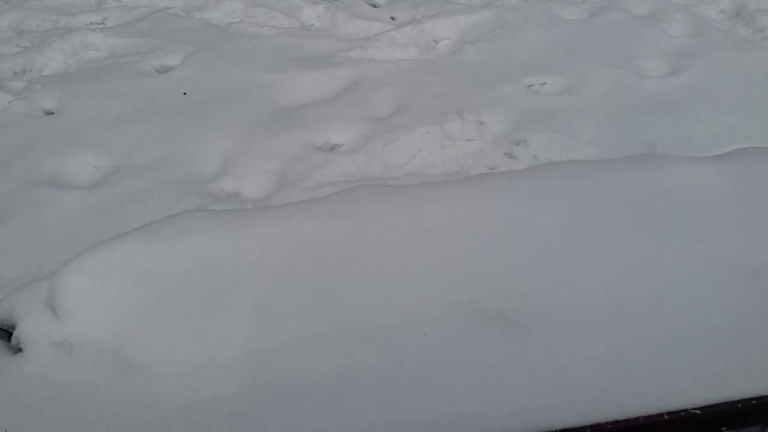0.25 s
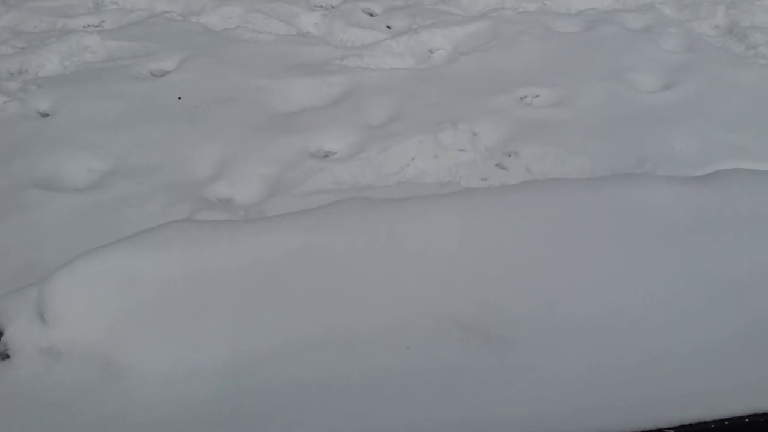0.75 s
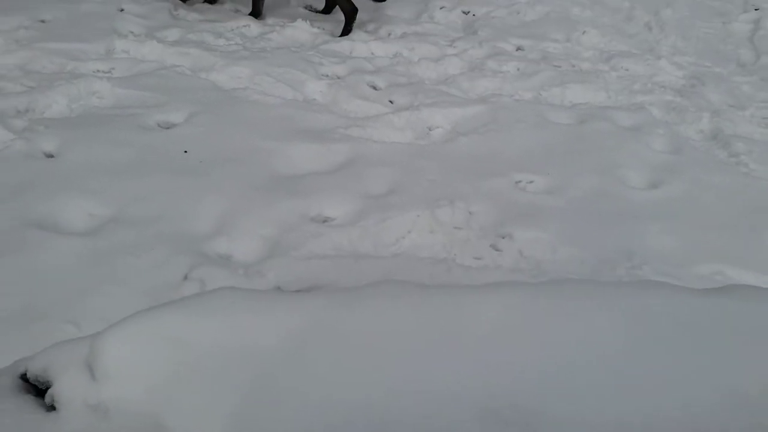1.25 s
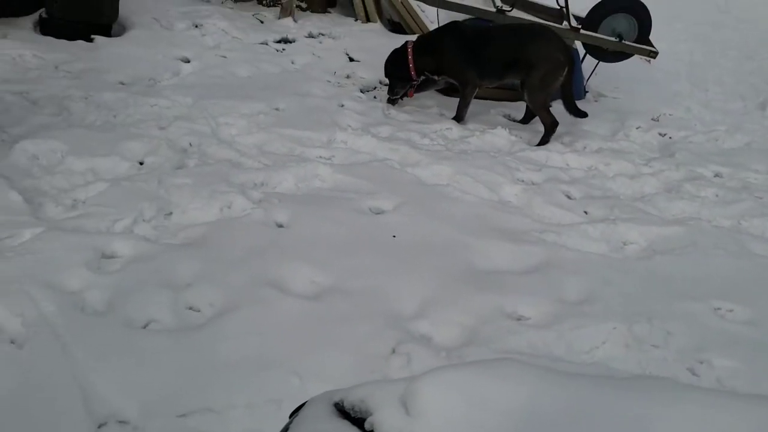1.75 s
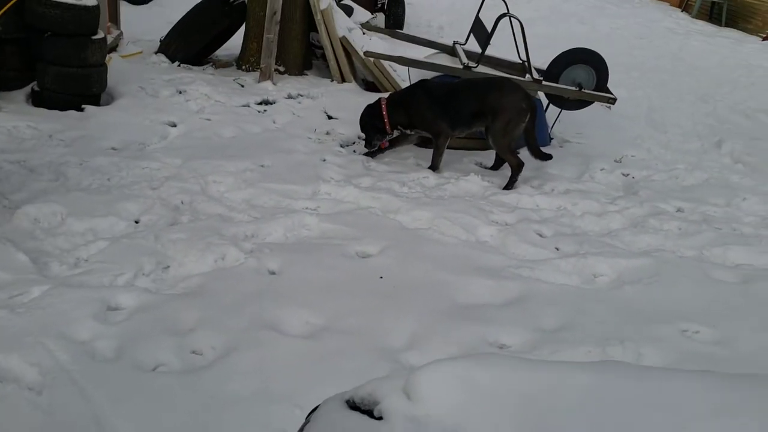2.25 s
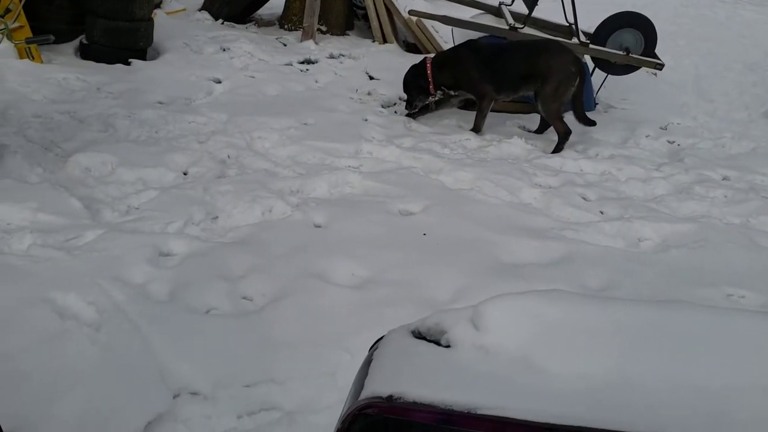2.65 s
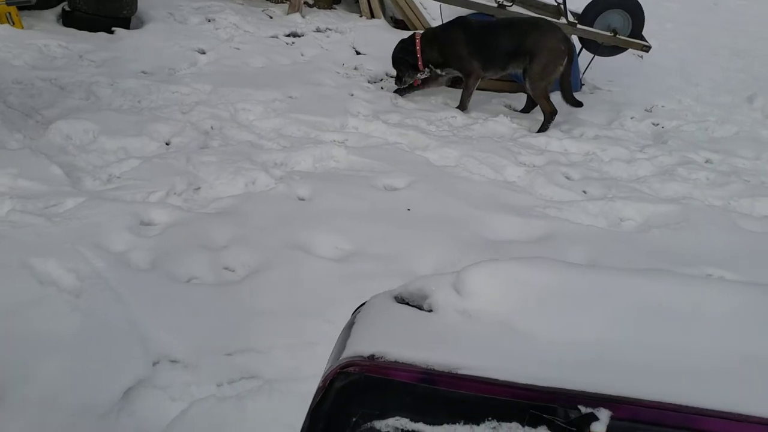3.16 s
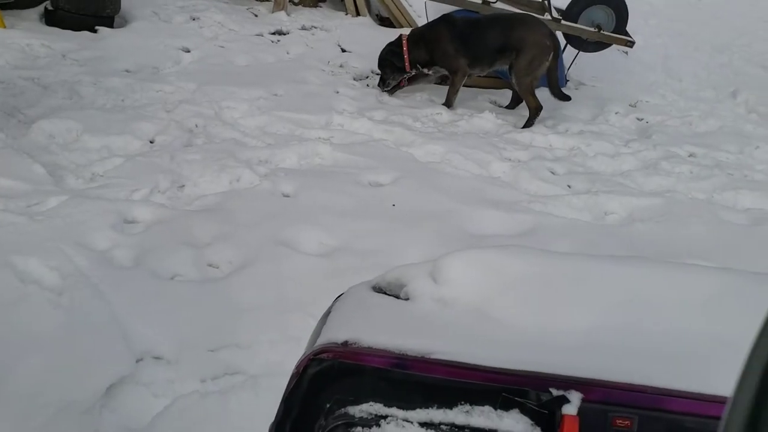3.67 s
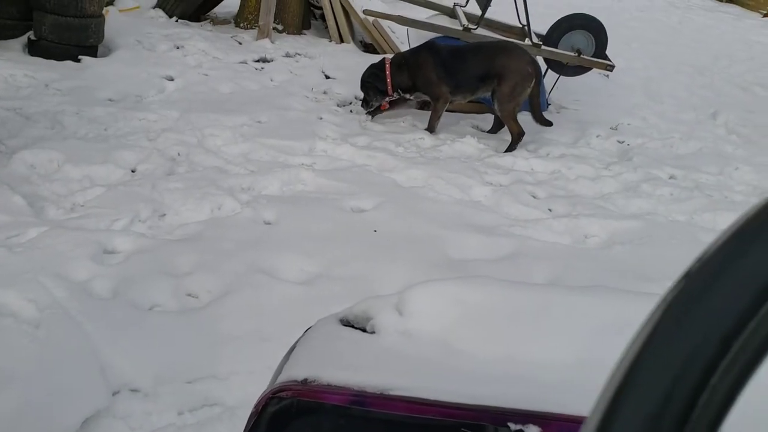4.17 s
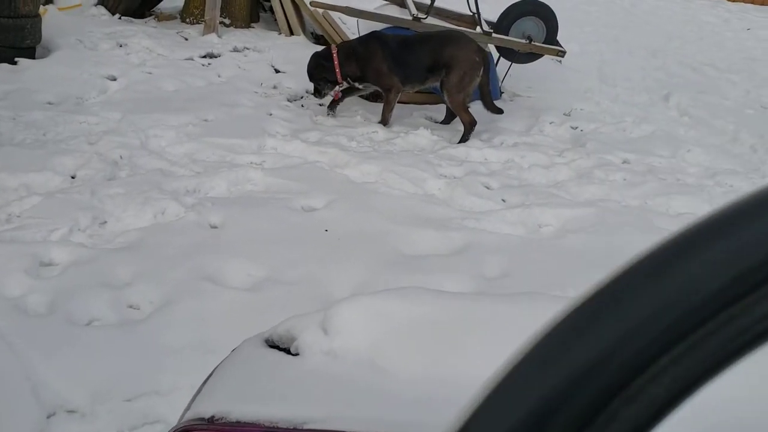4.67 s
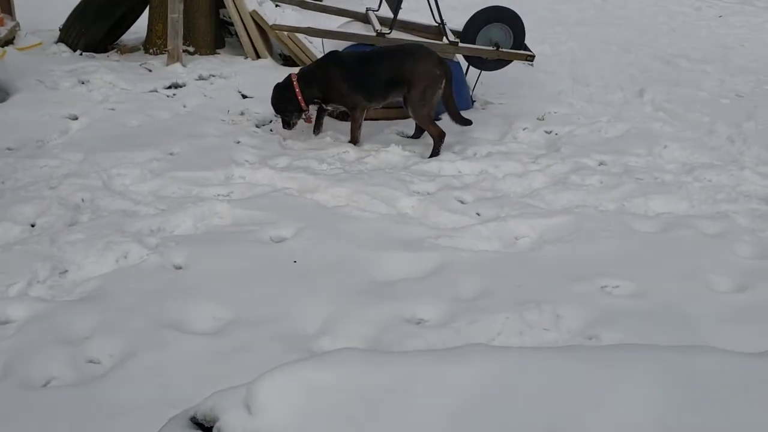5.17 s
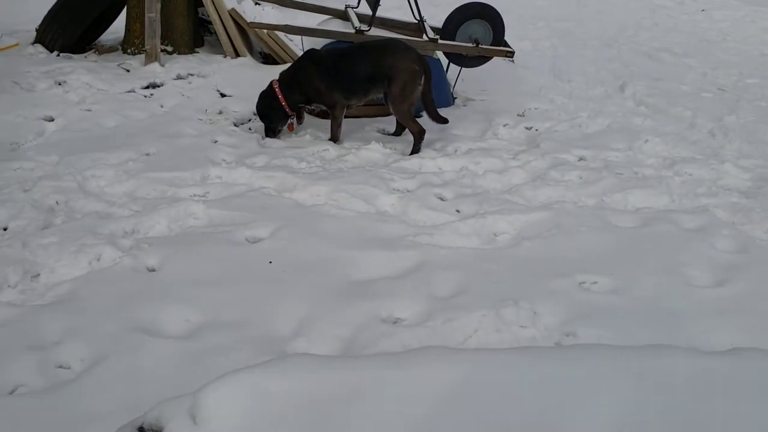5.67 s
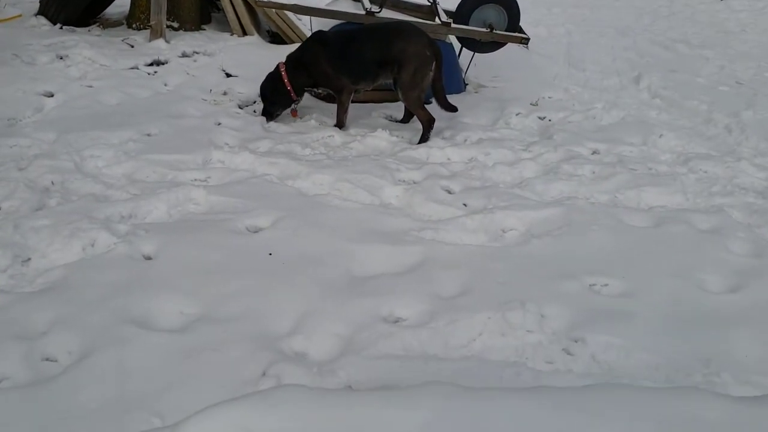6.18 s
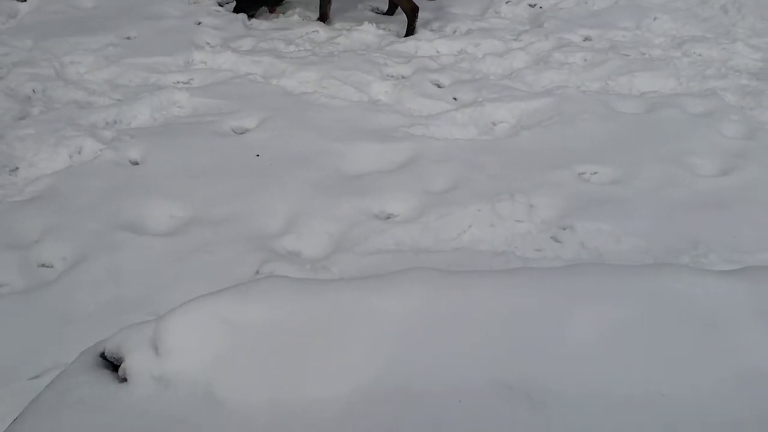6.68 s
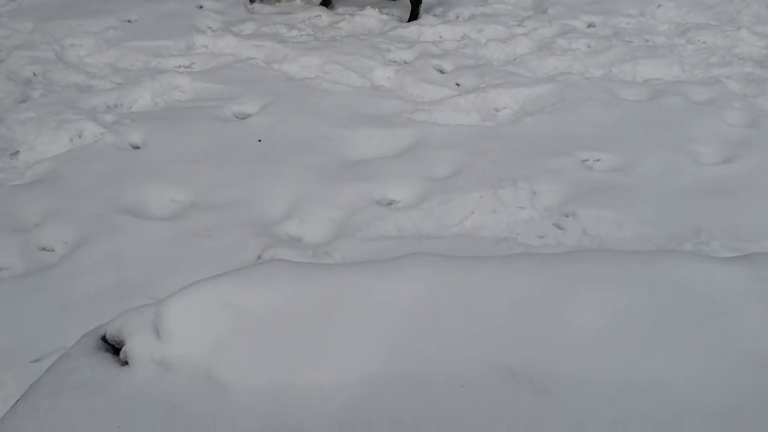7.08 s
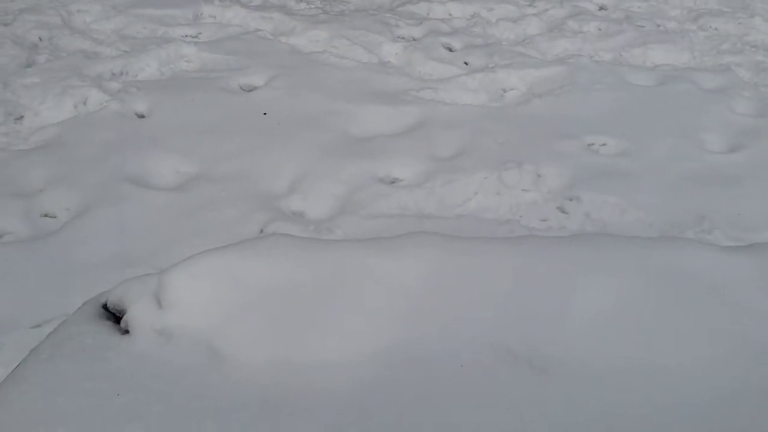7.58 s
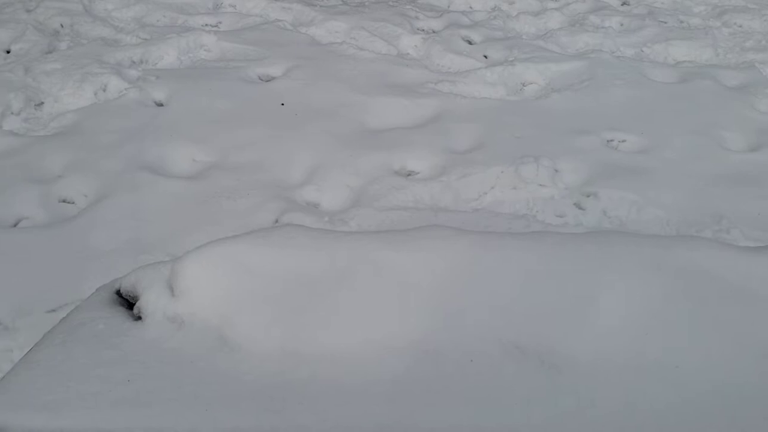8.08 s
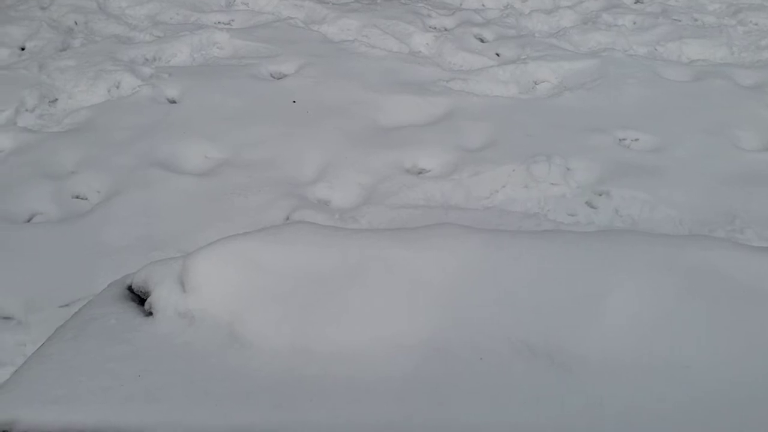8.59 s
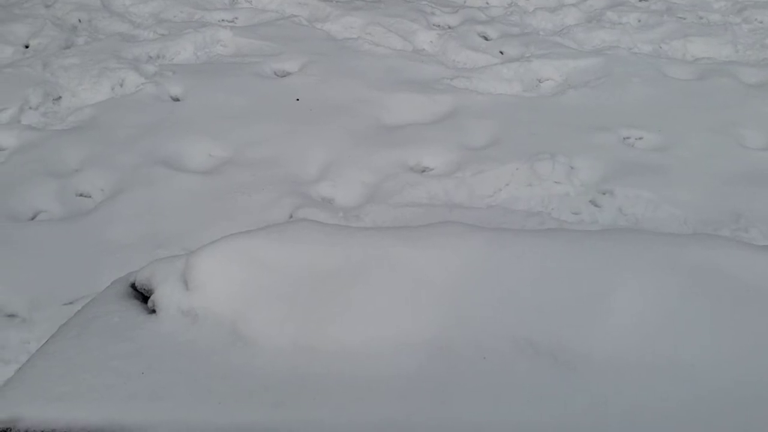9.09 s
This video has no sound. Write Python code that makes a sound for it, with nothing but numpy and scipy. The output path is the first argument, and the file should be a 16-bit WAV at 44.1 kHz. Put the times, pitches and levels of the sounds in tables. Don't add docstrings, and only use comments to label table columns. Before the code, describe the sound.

A small single-cylinder engine idles under a cart seat in a snowy yard, recorded close in stereo. From 0 to 1.7 s it putters unevenly, about seven deep pulses a second, with body panels droning low. A seat creak opens, followed by ticks, sharp clicks, dull knocks and crackling stiff jacket cloth; a firm thump lands at 1.7. From 2 s the firing grows fuller, faster and steady, with faint belt whine and soft rustles. It sags at 3.6-4 s with a knock near 3.85, then climbs to about eleven pulses a second by 6, a nylon zip at 5.3. Cloth swells from 6.3, and a sleeve rubs the microphone heavily around 7. The strongest thump hits at 7.2 as the engine drops away; smaller knocks and ticks follow. At 8.2 it is weakest and slowest, then lumpily gathers again until 9.3, cloth nearly still.

```python
import sys
import numpy as np
from scipy import signal
from scipy.fft import rfft, irfft, next_fast_len
from scipy.io import wavfile
from scipy.ndimage import uniform_filter1d, map_coordinates

SR = 44100
rng = np.random.default_rng(int(sys.argv[2]) if len(sys.argv) > 2 else 0)


def put_to_file(sound):
    columns = np.atleast_2d(sound).T
    safe = np.clip(columns, -1, 1)
    whole_steps = np.round(safe * 32767)
    wavfile.write(sys.argv[1], SR, whole_steps.astype(np.int16))


def boost(x):
    u = np.asarray(x, float) / 20
    return 10 ** u


N = 411894

# [t/s, rate/Hz, unevenness/0-1]
SPEED = [(0.0, 7.0, 0.36), (1.4, 7.0, 0.36), (1.7, 7.9, 0.1), (2.0, 8.89, 0.04), (2.3, 9.24, 0.03),
         (2.8, 10.06, 0.03), (3.45, 10.07, 0.03), (3.65, 9.19, 0.2), (3.9, 7.31, 0.3), (4.3, 8.6, 0.06),
         (4.7, 9.68, 0.03), (5.2, 10.71, 0.03), (6.0, 10.94, 0.03), (6.9, 10.78, 0.03), (7.35, 7.55, 0.3),
         (8.2, 5.65, 0.2), (8.6, 6.76, 0.12), (9.34, 7.7, 0.12)]
# [t/s, level/dB]
LOAD = [(0.0, -50), (0.28, -51.5), (1.17, -48), (2.05, -41), (2.84, -42), (3.5, -43), (3.8, -47.5),
        (4.45, -42.5), (5.25, -41), (6.09, -40), (6.84, -41), (7.2, -51.5), (7.4, -50), (8.05, -54.5),
        (8.2, -58), (8.27, -50.5), (8.7, -49.5), (9.34, -47)]
FIRES_AT_S = 8.715
# [f/Hz, level/dB]
EXHAUST = [(22, -65), (33, -21.5), (42, -12), (55, 14.5), (110, -12), (210, -22.5), (350, -31.5),
           (2000, -64)]
# [f/Hz, density/dB per Hz]
CASING = [(82, 0.5), (140, 1), (275, -7.5), (406, -13), (470, -11.5), (592, -21), (948, -22), (1140, -29.5),
          (1560, -24.5), (1760, -32), (3500, -62), (4550, -64.5), (7700, -120)]
# [f/Hz, width/Hz, lift/dB]
BLOCK = [(204, 42, -9), (344.6, 15, -1), (920, 29, -1.5), (1020, 11, 3), (1189, 13, 16), (1380, 14, -0.5)]
CASING_DB, CASING_GROWS, FULL_LOAD_DB = -41, 0.7, -46.5
BOOM_HZ, BOOM_GROWS = 280, 0.9
# [order/multiple of firing rate, level/dB]
WHINE = [(44.4, -50), (48, -48.5), (51, -57)]
# [t/s, hold/s, level/dB]
BELT = [
    (2.1, 1.4, 0),
    (4.6, .9, -8),
    (5.6, 1.2, -1),
]
# [order/multiple of firing rate, level/dB]
FAN = [(89, -62), (96, -62)]
# [t/s, hold/s, level/dB]
FAN_SINGS = [
    (4.5, 1.25, 0),
]
# [f/Hz, level/dB]
SHROUD = [(400, -18), (445, -9), (478, 0), (520, -12), (560, -8), (870, -8), (940, -2), (1030, -4),
          (1070, -14)]
VALVE_HZ, VALVE_WIDE_HZ, VALVE_DB = 1035, 80, -21
# [t/s, hold/s, level/dB]
VALVE_RINGS = [
    (2.6, .72, 0),
]
CHUFF_HZ, CHUFF_WIDE_HZ, CHUFF_DB = 335, 90, -10
SLOW_RATE_HZ = 8
# [f/Hz, width/Hz, level over load/dB]
PANELS = [(84, 12, 1), (60.34, 7, 5.5)]
UPPER_DB, LOWER_DB = 5.5, 7.5
# [t/s, peak level/dB, length/s]
SURGES = [(0.01, -24, 0.097), (0.154, -24.5, 0.12), (.37, -28, 0.15), (0.495, -25, 0.052),
          (0.647, -26.5, 0.14), (0.76, -23.5, .1), (0.997, -27.5, 0.12), (1.34, -26.5, 0.14),
          (1.514, -27.5, 0.086), (1.657, -22.5, 0.039), (1.132, -27.5, 0.031), (1.861, -26.5, 0.07),
          (1.956, -22.5, 0.096), (2.13, -34, 0.067), (2.3, -28, 0.21), (2.489, -26.5, 0.25),
          (2.66, -27, 0.13), (2.868, -24, 0.049), (3.062, -25, 0.1), (3.265, -25, .08), (3.372, -24, 0.042),
          (3.516, -23.5, 0.25), (3.804, -25, 0.088), (4.011, -21, 0.15), (4.186, -23, 0.026),
          (4.287, -23.5, 0.14), (4.553, -26.5, 0.2), (4.702, -29, 0.22), (4.788, -30, 0.095),
          (5.05, -27, 0.086), (5.183, -25, 0.019), (5.27, -28, 0.069), (5.497, -26.5, 0.17),
          (5.666, -25, 0.06), (5.864, -24, 0.12), (6.048, -24.5, 0.045), (6.227, -23, 0.05),
          (6.326, -26, 0.025), (6.506, -26, 0.045), (6.698, -22, 0.053), (6.874, -23.5, 0.091),
          (7.208, -23.5, 0.17), (7.87, -35.5, 0.043), (7.96, -38, 0.033), (8.08, -33.5, 0.038),
          (8.29, -29, 0.035), (8.354, -25.5, 0.11), (8.512, -26, 0.089), (8.678, -21, 0.13),
          (8.844, -25.5, 0.058), (8.941, -25.5, .07), (9.024, -25, 0.055), (9.128, -24, 0.089),
          (9.278, -31.5, 0.083)]
# [t/s, peak level/dB, length/s]
HEAVES = [
    (.12, -36, 0.38),
    (1.99, -33, .06),
    (3.64, -32, 0.15),
    (4.35, -36, 0.1),
    (8.92, -31, .12),
    (9.12, -30.5, 0.18),
    (9.3, -32, .1),
]
# [t/s, peak level/dB]
CREAK = [
    (0.0014, -30),
    (0.0296, -39),
    (0.0507, -35.5),
    (0.082, -37),
    (0.1108, -40.5),
    (0.1272, -47),
    (0.1434, -36.5),
    (0.1595, -39.5),
    (0.1747, -42),
    (0.195, -37.5),
]
# [f/Hz, width/Hz, level/dB]
SEAT = [(1160, 83, -3), (1400, 68, -12.5), (1720, 58, -11.5), (2110, 85, -21), (2430, 37, -21.5),
        (4500, 51, -22.5), (5650, 55, -22.5)]
# [t/s, peak level/dB, ring f/Hz, brightness/dB]
TICKS = [(0.4133, -31.5, 1640, -30), (0.452, -34.5, 2310, -20), (0.5061, -18, 1400, -13),
         (0.539, -25.5, 1190, -32), (.552, -28, 1500, -25), (0.5594, -22, 1240, -30),
         (0.697, -16, 1820, -14.5), (0.865, -27, 2680, -30.5), (.78, -40, 900, -25),
         (0.901, -46, 1540, -24), (0.995, -33, 1670, -26), (1.025, -37, 1380, -25),
         (1.0508, -29, 1720, -16), (1.085, -27, 1880, -25), (1.098, -25.5, 955, -25),
         (1.16, -35.5, 2600, -18), (1.348, -37, 980, -11), (1.126, -23.5, 1500, -19.5),
         (1.223, -19.5, 1480, -30), (1.2505, -30.5, 880, -18.5), (1.263, -33.5, 1400, -25),
         (1.361, -26, 1090, -28), (1.376, -10.5, 1310, -11), (1.423, -20, 1490, -13.5),
         (1.4485, -19, 1340, -30), (1.5, -32, 1090, -6), (1.5426, -17, 1630, -17.5),
         (1.568, -31, 1460, -25), (1.584, -30, 950, -28), (1.6736, -31, 1070, -25.5),
         (1.724, -34.5, 840, -5), (1.882, -23.5, 880, -25), (2.9496, -37, 1500, -9.5),
         (3.899, -29.5, 950, -26), (4.223, -26, 1790, -16), (5.3052, -32, 2550, -14),
         (6.932, -30, 1540, -20), (6.951, -22, 1020, -22), (7.012, -20, 1410, -22), (7.061, -29, 1010, -23),
         (7.2272, -24, 910, -17), (7.266, -37, 1030, -15.5), (7.312, -30, 755, -23), (7.381, -30, 1760, -6),
         (7.4098, -33, 1100, -11), (7.532, -39, 972, -17), (7.62, -34, 750, -19), (7.648, -23.5, 830, -21),
         (7.7154, -34, 1720, -21), (7.913, -38, 1400, -18), (7.9545, -35, 1280, -21.5)]
# [t/s, peak level/dB, f/Hz]
THUMPS = [
    (0.796, -11, 121),
    (0.818, -16.5, 154),
    (1.726, -9.5, 150),
    (4.059, -23, 121),
    (7.223, -5.5, 139.2),
          (0.498, -15, 530),
    (1.723, -13, 840),
    (1.886, -14.5, 428),
    (3.852, -12.5, 433),
    (3.899, -19, 317),
    (7.229, -30, 343),
    (7.407, -17.5, 310),
    (7.655, -14.5, 349),
    (7.954, -21.5, 308),
    (8.242, -27, 306),
]
# [t/s, hold/s, level/dB]
HUMS = [
    (7.82, .035, -54),
    (7.99, 0.049, -51.5),
]
HUM_HZ = 441
# [t/s, peak level/dB]
SNAPS = [(0.4989, -27), (0.6976, -16), (1.3626, -37.5), (1.545, -35.5), (1.675, -40), (1.7267, -28.5),
         (1.8672, -38), (2.3249, -36), (2.587, -37.5), (2.7985, -35), (3.369, -39.5), (3.811, -39.5),
         (4.005, -39), (4.2205, -33), (4.293, -48), (4.766, -42), (4.972, -45.5), (5.239, -43),
         (5.3034, -41), (5.8, -40.5), (5.992, -41), (7.338, -34), (7.3893, -23.5), (7.647, -34.5),
         (7.731, -36.5), (8.118, -48), (8.5803, -49.5),
         (0.7771, -45), (0.7957, -35), (0.836, -45), (0.9035, -31.5), (0.924, -33.5), (0.955, -37),
           (0.9716, -36), (1.024, -34), (1.0829, -35), (1.0964, -38.5), (1.1338, -31.5), (1.1603, -32),
           (1.2224, -33.5), (1.2604, -44), (1.288, -37), (1.3099, -34), (1.4057, -41), (1.443, -36),
           (1.474, -39), (1.5774, -46), (1.6137, -40), (1.7753, -37), (1.799, -38), (1.8164, -35),
           (2.2183, -44), (2.2373, -48), (2.2524, -43), (2.4953, -41), (2.7382, -46), (2.988, -39.5),
           (3.0063, -40.5), (3.0375, -42), (3.1073, -45), (3.1832, -47), (3.401, -39.5), (3.852, -35.5),
           (4.0494, -32), (4.0845, -43), (4.642, -43), (4.8484, -49), (5.056, -48), (5.143, -49),
           (5.706, -42), (5.943, -46), (6.07, -45), (7.889, -40), (7.9132, -34.5), (7.9316, -38),
           (7.9533, -42.5), (7.991, -47), (8.5609, -56), (9.218, -52.5)]
# [start/s, end/s, rate/Hz, level/dB]
FLURRIES = [
    (2.339, 2.48, 38, -39),
    (3.871, 3.99, 63, -40.5),
    (6.789, 6.893, 32, -34),
]
# [t/s, peak level/dB, f/Hz]
PIPS = [(.327, -47.5, 2200), (.43, -43, 3200), (.629, -37.5, 2500), (.648, -43, 6200), (.707, -33, 1290),
        (.757, -37, 2500), (.509, -30.5, 3600), (.879, -36, 2300), (.985, -36, 2300), (1.582, -45, 5000),
        (7.973, -45, 1200), (1.361, -16, 13100), (1.363, -27, 5600), (1.477, -38, 12200),
        (1.734, -26, 12500), (1.792, -38, 7000), (1.811, -36, 2500), (2.703, -46, 6300), (2.789, -37, 2200),
        (2.789, -40, 4800), (2.805, -44, 6500), (3.039, -42, 2300), (5.549, -44, 2500), (5.587, -48, 4300),
        (5.637, -52, 2600), (5.666, -49, 3200), (7.786, -46, 3000), (7.89, -41, 1500), (7.912, -48, 2200),
        (7.934, -42, 5600), (7.992, -38.5, 2700), (8.009, -43, 1600), (8.395, -61.5, 2700),
        (8.43, -63, 3000)]
# [f/Hz, level/dB]
CRACK = [(600, -45), (1800, -0.5), (3000, -2), (5500, -4), (7400, -7.5), (12300, -1.5), (15600, -16.5),
         (16500, -40)]
# [t/s, hold/s, level/dB, rise/s, fall/s]
JACKET = [(0.524, 0.14, -59.5, 0.45, .05), (0.792, 0.5, -51.5, 0.2, 0.48),
          (1.367, 0.012, -44, 0.0068, 0.087), (1.515, 0.026, -51, 0.06, 0.13),
          (1.721, .01, -53.5, 0.0043, 0.28), (1.872, 0.025, -49, 0.014, 0.24),
          (2.25, 0.27, -55, .12, 0.055), (2.574, 0.27, -66.5, .05, 0.54),
          (2.789, 0.013, -54.5, 0.021, 0.044), (2.814, 0.55, -62, 0.12, 0.45),
          (3.708, .02, -65.5, 0.11, 0.059), (3.814, .16, -56, 0.014, 0.017),
          (4.005, 0.048, -60.5, 0.019, 0.17), (4.207, 0.034, -67, 0.056, 0.21),
          (4.66, 0.056, -60.5, 0.15, 0.17), (4.778, 0.51, -71.5, 0.12, .08),
          (5.305, 0.0073, -45.5, 0.0051, 0.071), (5.426, 0.084, -52, 0.065, 0.092),
          (5.563, 0.37, -64, .05, 0.53), (6.67, 0.07, -45.5, 0.53, 0.36), (6.98, 0.13, -36, 0.11, 0.11),
          (7.2, 0.19, -50, 0.077, 0.56), (7.893, 0.11, -64, 0.035, 0.03), (8.31, 0.15, -75.5, 0.04, 0.065)]
STILL_DB, POP_TOP_DB = -78, -43
# [f/Hz, density/dB per Hz]
CLOTH = [(290, -31), (500, 0.5), (1540, -4), (4350, -15), (5100, -16.5), (7000, -17), (8690, -17.5),
         (12500, -12), (15700, -23)]
# [t/s, level/dB]
FOLDS = [
    (0, 0),
    (.7, -3),
    (1.3, 2),
    (2, -2.5),
    (3.5, 4),
    (6.55, -9.5),
    (6.68, 0.5),
    (7.4, -5),
    (7.95, 3),
    (8.3, -17),
]
# [t/s, hold/s, level/dB]
CRUMPLING = [
    (.85, .5, -4),
    (1.4, .2, -6),
    (3.9, .02, -4),
    (7.55, .45, -6),
]
# [start/s, end/s, f/Hz, level/dB, rise/s]
SLIDES = [
    (2.27, 2.58, 5000, -57, .04),
    (5.304, 5.45, 2850, -48, .003),
    (5.36, 5.57, 3050, -52.5, .08),
    (4.78, 5.02, 5000, -67.5, .004),
    (5.72, 5.98, 5200, -66, .04),
    (4.7, 4.8, 1700, -56, .004),
    (5.68, 6.0, 3250, -62.5, .03),
    (6.28, 6.74, 2260, -56, .22),
    (2.87, 2.96, 5200, -60, .015),
    (5.5, 5.66, 2300, -61, .03),
]
# [t/s, level/dB]
SLEEVE = [
    (6.6, -55),
    (6.655, -37),
    (6.75, -40),
    (6.84, -47),
    (6.95, -28),
    (7.13, -29.5),
    (7.186, -39),
    (7.234, -38),
    (7.33, -59),
]
# [f/Hz, density/dB per Hz]
BRUSH = [(59, -36.5), (100, -4), (135, -2.5), (279, -6.5), (376, -17), (472, -14), (645, -19), (3000, -34),
         (3900, -21), (6600, -120)]
# [f/Hz, correlation/0-1]
ALIKE = [(130, 1), (290, 0.88), (640, 0.55), (1400, 0.28), (3000, 0.18), (8000, 0.04)]
# [f/Hz, L-R level/dB]
LEAN = [(150, 0), (400, .8), (750, 1.2), (1300, 7.5), (2500, -.5), (5000, -3.5), (12000, -5)]
# [f/Hz, phase/rad]
LEADS = [(60, .06), (1030, .25), (2200, -1), (3450, -2.6), (5000, -5), (6890, -3.7), (10000, -2),
         (16500, -2)]
# [f/Hz, width/Hz, depth/0-1]
NOTCHES = [(4000, 500, .4), (7450, 600, .7), (10900, 600, .5)]
# [f/Hz, density/dB per Hz]
HISS = [(1500, -100), (2800, -108), (7500, -89), (12000, -74.5), (16000, -81.5)]
LOW_CUT_HZ, TOP_HZ = 31, 15850


def unit(x):
    return x / np.sqrt(np.mean(x ** 2) + 1e-20)


def along(points, hz):
    f, v = np.transpose(points)
    return np.interp(np.log(hz + 1), np.log(f + 1), v)


def curves(rows):
    s, *cols = np.transpose(rows)
    return [np.interp(np.arange(N) / SR, s, c) for c in cols]


def wobble(rate_hz):
    knots = rng.standard_normal(int(N * rate_hz / SR) + 4)
    return map_coordinates(knots, [np.arange(N) * rate_hz / SR])


def filtered(x, response):
    m = next_fast_len(N + SR // 2, real=True)
    return irfft(rfft(x, m) * response(np.fft.rfftfreq(m, 1 / SR)), m)[..., :N]


def causal(spectrum):
    def response(hz):
        ceps = irfft(np.log(boost(along(spectrum, hz)) + 1e-6))
        ceps[1:len(hz) - 1] *= 2
        ceps[len(hz):] = 0
        return np.exp(rfft(ceps))
    return response


def peak(f, hz, width_hz):
    return 1 / (1 + ((f - hz) / (width_hz / 2)) ** 2)


def resonate(x, hz, width_hz):
    def response(f):
        damping = 1j * f * width_hz
        return (damping / (hz * hz - f * f + damping)) ** 2
    return unit(filtered(x, response))


def bandpassed(x, low_hz, high_hz):
    b, a = signal.butter(2, [low_hz, high_hz], "bandpass", fs=SR)
    return signal.lfilter(b, a, x)


def spread(pair, spectrum):
    def response(hz):
        turn = np.arccos(np.clip(along(ALIKE, hz), -1, 1)) / 2
        return boost(along(spectrum, hz)) * [np.cos(turn), np.sin(turn)]
    mid, side = filtered(pair, response)
    return unit(np.array([mid + side, mid - side]))


def patchy(depth_db, wide, long):
    z = signal.stft(rng.standard_normal((2, N)), nperseg=256)[2]
    field = uniform_filter1d(rng.standard_normal(z.shape[1:]), int(wide), 0)
    field = uniform_filter1d(field, int(long), 1, mode="wrap")
    return signal.istft(z * boost(depth_db * unit(field)), nperseg=256)[1][:, :N]


def slow(db):
    gain = np.sqrt(np.sum(boost(db) ** 2, axis=0))
    return np.interp(np.arange(N) / SR * 1000, np.arange(db.shape[1]), gain)


def strokes(s, hold, db, rise, fall):
    t = np.arange(0, N / SR + 1 / 1000, 1 / 1000)[:, None]
    outside = np.maximum((s - t) / rise, (t - s - hold) / fall)
    return slow((db - 20 * np.maximum(outside, 0)).T)


def swells(rows):
    s, db, length = np.transpose(rows)[..., None]
    t = np.arange(0, N / SR, 1 / 1000)
    return slow(db - 24 * ((t - s) / length) ** 2)


def add_at(out, s, sound):
    out[:, round(s * SR):][:, :sound.shape[-1]] += sound


def shaft():
    turns = np.cumsum(curves(SPEED)[0]) / SR
    return turns - turns[round(FIRES_AT_S * SR)]


def firings():
    at = np.flatnonzero(np.diff(np.floor(shaft())))
    uneven = curves(SPEED)[1][at]
    timing, strength = rng.standard_normal((2, len(at)))
    late = (0.07 * SR * uneven ** 2 * timing).astype(int)
    return np.bincount(np.clip(at + late, 0, N - 1), boost((0.6 + 4 * uneven) * strength), N)


def casing():
    load_over_full_db = curves(LOAD)[0] - FULL_LOAD_DB
    depth = 2.2 + 2 * np.minimum(curves(SPEED)[1], 0.15)
    puff = 1 + depth * uniform_filter1d(np.exp(-5 * (shaft() % 1)), size=600)
    roar = spread(unit(puff) * patchy(1.5, 3, 12), CASING)

    def ringing(f):
        return 1 + sum(boost(db) * peak(f, hz, width) for hz, width, db in BLOCK) / 2
    boom = filtered(roar, lambda f: ringing(f) / (1 + (f / BOOM_HZ) ** 6))
    boom_change = boost(BOOM_GROWS * np.minimum(load_over_full_db, 0)) - 1
    level = boost(CASING_DB + CASING_GROWS * load_over_full_db)
    return level * (filtered(roar, ringing) + boom_change * boom)


def whine(orders):
    rate, turns = curves(SPEED)[0], shaft()
    out = np.zeros(N)
    for k, db in orders:
        level = boost(db + along(SHROUD, k * rate) + 2.2 * wobble(10))
        out += level * np.sin(2 * np.pi * k * turns + k / 100 * wobble(14))
    return out


def engine(pulses):
    rate, load_db = curves(SPEED)[0], curves(LOAD)[0]
    exhaust = boost(load_db + 3.5) * unit(filtered(pulses, causal(EXHAUST)))
    valve = boost(load_db + VALVE_DB) * resonate(pulses, VALVE_HZ, VALVE_WIDE_HZ)
    labouring = np.clip(SLOW_RATE_HZ - rate, 0, 1)
    chuff = boost(load_db + CHUFF_DB) * labouring * resonate(pulses, CHUFF_HZ, CHUFF_WIDE_HZ)
    gripping, climbing, even = (strokes(*np.transpose(rows), rise=0.38, fall=0.42)
                                for rows in (BELT, FAN_SINGS, VALVE_RINGS))
    return exhaust + chuff + casing() + gripping * whine(WHINE) + even * valve + climbing * whine(FAN)


def bodywork(pulses):
    t, load = np.arange(N) / SR, boost(curves(LOAD)[0])
    shaking = unit(pulses) + 0.45 * rng.standard_normal(N)
    rung = load * sum(boost(db) * resonate(shaking, hz, width) for hz, width, db in PANELS)
    kick = uniform_filter1d(0.35 + np.exp(-2.5 * (shaft() % 1)), size=700)
    upper = np.sin(2 * np.pi * 85 * t + 1.76 * wobble(6.5) + 0.77 * wobble(24)) * boost(1.3 * wobble(22))
    lower = kick * np.sin(2 * np.pi * 61 * t + 1.5 * wobble(7.5)) * boost(2.2 * wobble(9))
    shaken = np.clip(4 * curves(SPEED)[1], 0, 1)
    upper_level = np.hypot(swells(SURGES), boost(UPPER_DB) * load * unit(kick))
    lower_level = np.hypot(swells(HEAVES), boost(LOWER_DB) * load * shaken)
    return rung + upper_level * unit(upper) + lower_level * unit(lower)


def flurries():
    runs = []
    for start, end, rate, db in FLURRIES:
        gap, size = rng.random((2, 40))
        s = start + (np.arange(40) + 0.52 * gap) / rate
        runs += list(zip(s, db + 9 * (size - 0.5)))[:np.sum(s < end)]
    return runs


def burst(t):
    noise = rng.standard_normal((2, len(t))) + 0.4 * rng.standard_normal(len(t))
    return noise * (boost(-60 * t / 0.006) + 0.15 * boost(-60 * t / 0.02))


def seat():
    out, cracks = np.zeros((2, N + SR)), np.zeros((2, N + SR))
    t = np.arange(SR // 10) / SR
    for s, db in CREAK:
        ring = sum(boost(level + rng.normal(0, 2.1)) * np.exp(-np.pi * w * t) * np.sin(2 * np.pi * hz * t)
                   for hz, w, level in SEAT)
        add_at(out, s, boost(db - 1) * ring)
        add_at(cracks, s, boost(db - 2) * burst(t))
    for s, db, hz, bright_db in TICKS:
        rattle = bandpassed(rng.standard_normal((2, len(t))), hz / 2.6, hz * 1.42)
        ring = np.sin(2 * np.pi * hz * t) * boost(-60 * t / 0.013) + 1.13 * rattle * boost(-60 * t / 0.028)
        add_at(out, s, boost(db) * ring * (1 - np.exp(-t / 0.00066)))
        add_at(cracks, s, boost(db + bright_db + 3) * burst(t))
    for s, db in SNAPS + flurries():
        add_at(cracks, s, boost(db + 3.5) * burst(t))
    for s, db, hz in PIPS:
        pop = bandpassed(burst(t), hz / 1.3, min(hz * 1.26, TOP_HZ))
        add_at(out, s, boost(db + 1) * pop / np.abs(pop).max())
    for s, db, hz in THUMPS:
        thud = sum(g * np.sin(2 * np.pi * ratio * hz * t) for ratio, g in ((1, 1), (1.703, 0.42), (2.6, 0.14)))
        decay = boost(db - 11 - 60 * t * hz / 12)
        add_at(out, s, decay * (1 - np.exp(-t / 0.0017)) * thud)
    humming = strokes(*np.transpose(HUMS), rise=0.018, fall=0.033)
    hum = humming * np.sin(2 * np.pi * HUM_HZ * np.arange(N) / SR + wobble(30))
    return out[:, :N] + hum + filtered(cracks[:, :N], causal(CRACK))


def crinkles(count=900):
    t = np.arange(SR // 100) / SR
    when, pitch, rarity, side = rng.random((4, count, 1))
    hz = 700 * 4 ** pitch
    size = boost(-4 * np.log(rarity + 0.02))
    ring = size * np.sin(2 * np.pi * hz * t) * np.exp(-hz * t / 2)
    at = (when * N).astype(int) + np.arange(len(t))
    gains = [np.cos(side * np.pi / 2), np.sin(side * np.pi / 2)]
    return unit(np.array([np.bincount(at.ravel(), (g * ring).ravel(), N)[:N] for g in gains]))


def jacket():
    t = np.arange(N) / SR
    moving = strokes(*np.transpose(JACKET)) + boost(STILL_DB + 3.5 * wobble(8))
    full_db = curves(FOLDS)[0]
    crackle = (rng.random(N) < 120 / SR) * boost(1.9 * rng.exponential(size=N).clip(0, 2.2))
    crackle = signal.fftconvolve(crackle, boost(-60 * t[:900] / 0.014))[:N]
    grain = (1 + 0.59 * crackle) * boost(1.2 * wobble(30)) * patchy(2.1, 4.5, 5.5)
    cloth = spread(grain, CLOTH)
    bright = filtered(cloth, lambda hz: 1 / (1 + (2600 / (hz + 1)) ** 4))
    out = moving * (bright + boost(full_db) * (cloth - bright)) / np.std(bright)
    out += np.minimum(moving, boost(POP_TOP_DB)) * boost(full_db - 15) * crinkles()
    out += moving * boost(3) * strokes(*np.transpose(CRUMPLING), rise=0.034, fall=0.17) * crinkles()
    for start, end, hz, slide_db, rise in SLIDES:
        span = slice(round(start * SR), round(end * SR))
        stroke = np.clip(np.minimum((t[span] - start) / rise, (end - t[span]) / 0.12), 0, 1)
        band = bandpassed(grain[:, span], 0.84 * hz, 1.18 * hz)
        out[:, span] += boost(slide_db) * stroke * unit(band)
    return out


def sleeve():
    t = np.arange(N) / SR
    touching = np.clip(np.minimum(t - SLEEVE[0][0], SLEEVE[-1][0] - t) / 0.11, 0, 1)
    lumps = boost(2.5 * wobble(70)) * rng.standard_normal((2, N))
    return touching * boost(curves(SLEEVE)[0]) * spread(lumps * [[1], [0.5]], BRUSH)


def scene():
    pulses = firings()
    return engine(pulses) + bodywork(pulses) + seat() + jacket() + sleeve()


def low_pass(x):
    return signal.sosfilt(signal.butter(12, 15950, fs=SR, output="sos"), x)


def record(dry):
    half = np.array([[0.5], [-0.5]])

    def port(hz):
        lean = boost(half * along(LEAN, hz)) * np.exp(1j * half * along(LEADS, hz))
        notches = np.prod([1 - depth * peak(hz, c, width) for c, width, depth in NOTCHES], axis=0)
        low_cut = 1 / (1 + (LOW_CUT_HZ / (hz + 1)) ** 6)
        return lean * notches * low_cut * np.where(hz < TOP_HZ, 1, boost(-3))
    hiss = boost(-75) * spread(rng.standard_normal((2, N)), HISS)
    return low_pass(filtered(dry + hiss, port))


dry = scene()
out = record(dry)
put_to_file(out)
```